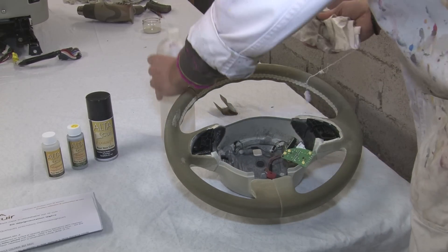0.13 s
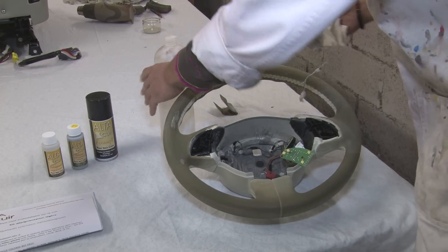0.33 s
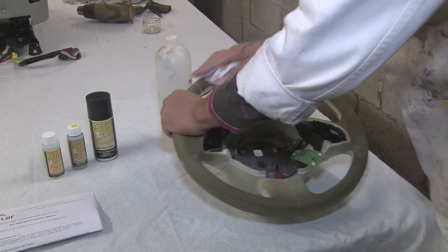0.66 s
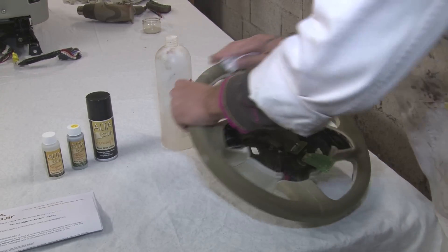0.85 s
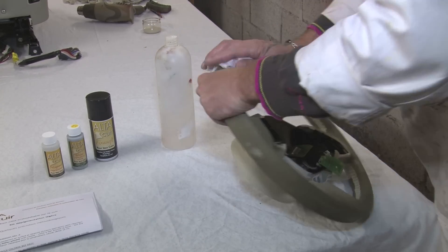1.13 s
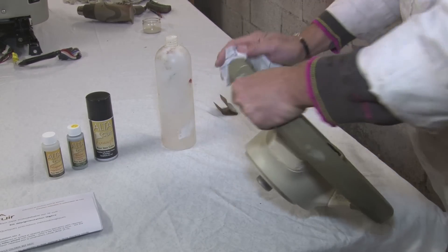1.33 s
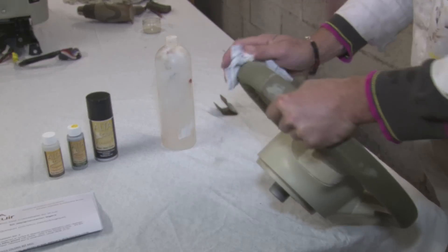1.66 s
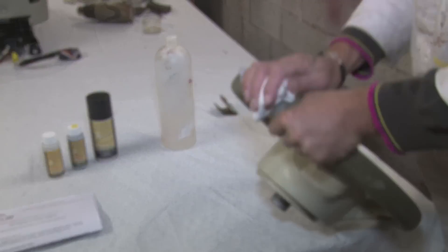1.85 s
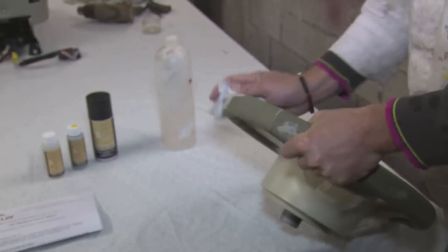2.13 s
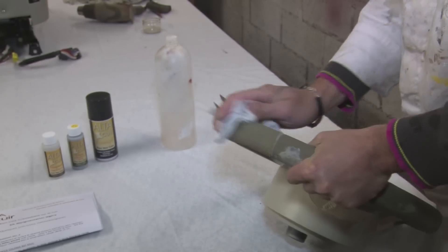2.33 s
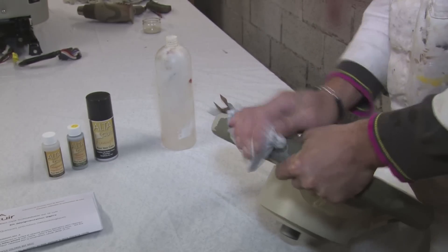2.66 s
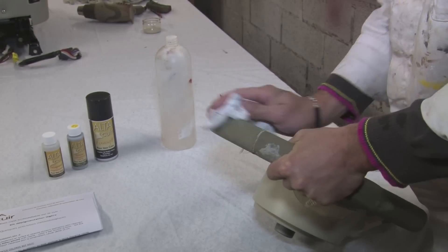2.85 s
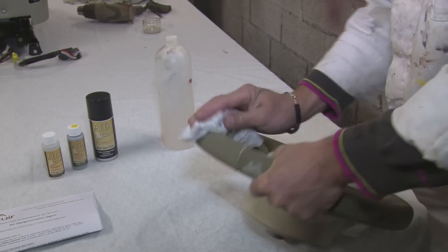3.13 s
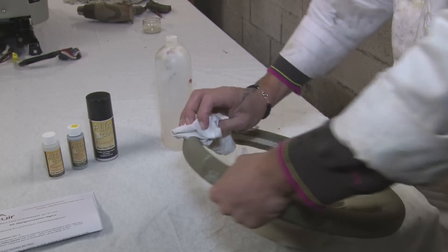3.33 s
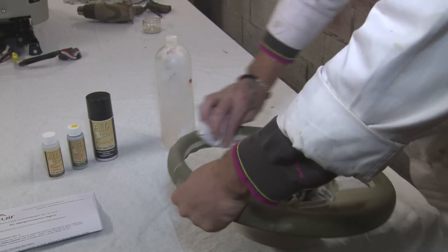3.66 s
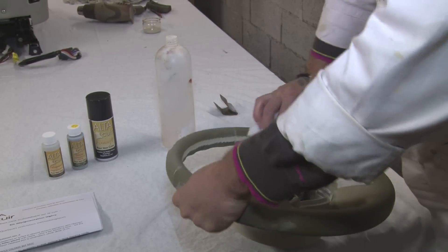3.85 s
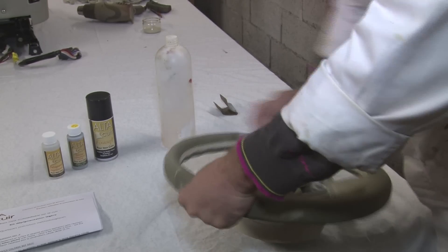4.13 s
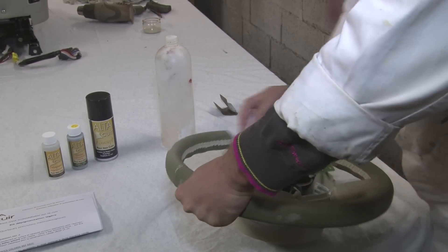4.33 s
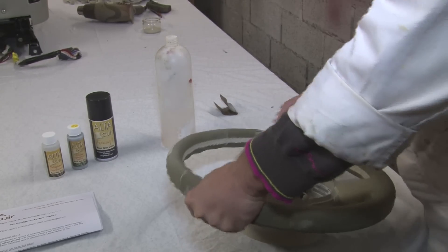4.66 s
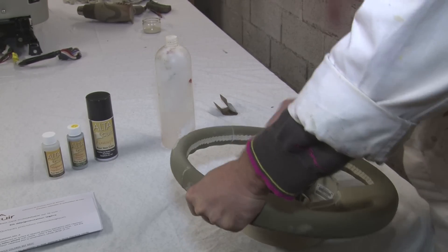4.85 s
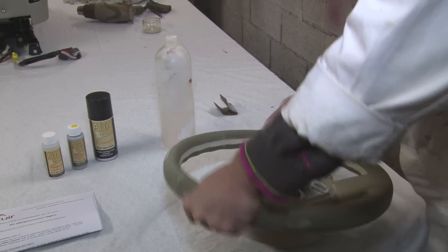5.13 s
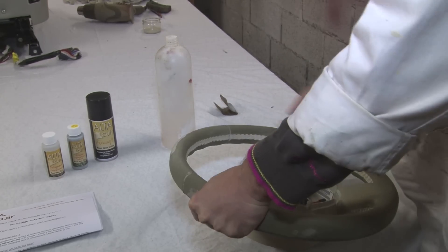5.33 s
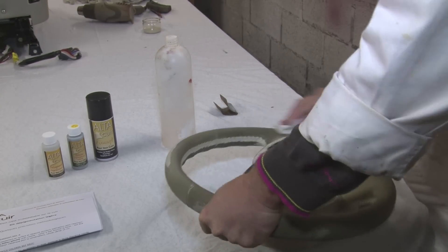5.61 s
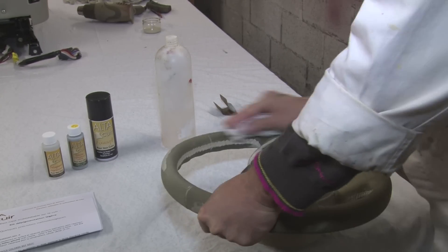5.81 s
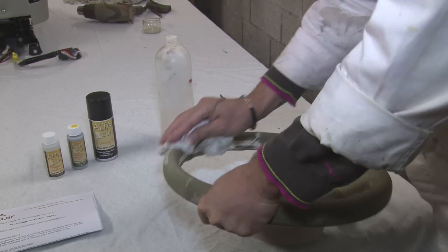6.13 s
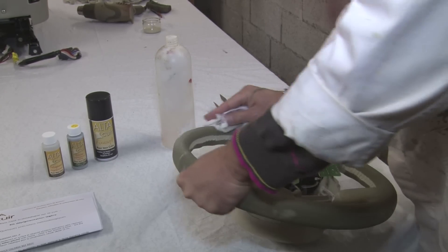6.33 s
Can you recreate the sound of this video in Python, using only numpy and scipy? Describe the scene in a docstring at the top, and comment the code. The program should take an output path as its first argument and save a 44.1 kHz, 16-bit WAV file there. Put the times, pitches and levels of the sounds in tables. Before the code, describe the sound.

A close stereo pickup in a bare workshop, with faint steady air noise and short echoes. At about 0.26 s a plastic bottle lands hard on a covered bench: a loud, boomy knock with a quick clattering second contact, by far the loudest event, dropping abruptly at about 0.33 s. Faint rustling leads to a rag rubbing a leather steering wheel rim from 0.65 s, in dry, grainy swishes about a fifth of a second long. Soft bumps and scuffs as the wheel shifts come at 1.05-1.3 s, over low rumble. The wiping is brighter and stronger from 1.9 to 3.1 s, with a tiny squeak at 2.26 s, then thins briefly before a fuller stroke at 3.6 s. A low tap falls at 3.75 s. From 4.3 to 5.3 s knuckle raps and snaps cluster among rougher scuffs, clearest at 4.35 and 4.5 s. A long, strong wipe at 5.75-6.1 s precedes weaker final strokes.

```python
"""A plastic bottle is set down hard on a covered workbench in a bare workshop: clicks and chatter ring its modes.
Sleeve or rag rustles; then a rag is wiped back and forth over a leather steering wheel rim: swelling grain noise.
As it goes on the wheel scuffs and bumps on the bench, which rumbles, and two fibres whistle briefly.
Later, knuckles and rag snap on the rim more often; echoes and faint air noise lie under everything."""
import sys
import numpy as np
from scipy import signal
from scipy.fft import rfft, irfft
from scipy.io import wavfile

SR = 44100
rng = np.random.default_rng(int(sys.argv[2]) if len(sys.argv) > 2 else 0)


def persist_wave(psi):
    """Save psi, clipped to +-1, as 16-bit WAV."""
    counts = np.round(np.clip(psi, -1, 1) * 32767).astype(np.int16)
    wavfile.write(sys.argv[1], SR, np.atleast_2d(counts).T)


N = 285768

# Spectra of the fibre hiss and of the leather body: (frequency [Hz], relative density [dB per Hz])
FIBRE_SPECTRUM = [(1940, -31), (3300, -6.5), (3540, -13), (4390, -7), (4900, -7.5), (6280, -3.5),
                  (8410, -9), (9330, -14.5), (10700, -10.5), (15600, -20.5)]
LEATHER_SPECTRUM = [(530, -123), (900, -8), (1130, -5.5), (1280, -5), (1440, -3), (2520, 4.5), (3530, -2),
                    (3700, -2.5), (4810, -10.5), (8140, -120)]
LINT_HZ = 8220   # the finest fibre ends sound above this


def rag():
    """Friction noise: fibres skipping over the grain hiss, finest ends highest; the padded leather answers lower."""
    fibres = coloured(FIBRE_SPECTRUM, spread_db=2.0, patchy_db=0.88, side_db=-15.0)
    lint = rms_one(butter_filter(5, LINT_HZ, "high", fibres))
    weave = rms_one(butter_filter(5, LINT_HZ, "low", fibres))
    leather = coloured(LEATHER_SPECTRUM, spread_db=1.5, patchy_db=2.0, side_db=6)
    out = np.sqrt(stroke_power("hiss")) * weave
    out += np.sqrt(stroke_power("lint")) * lint
    return out + np.sqrt(stroke_power("body")) * leather


# Strokes of the rag (the first two rows: rustle of sleeve or rag before the wiping):
# (start [s], length [s], share of the length before top speed [1],
# pointedness, small = long hold at the top [1], fibre hiss level [dB], finest fibres against the hiss [dB],
# leather body against the hiss [dB], share of the length before the leather is loudest [1])
RAG_STROKES = [(0.255, 0.17, 0.15, 0.51, -64, -13, 0, 0.3), (0.417, 0.22, 0.2, 2.0, -73.5, -8, -6, 0.36),
               (0.591, 0.14, 0.13, 2.3, -58.7, -5.5, -13, 0.12),
               (0.647, 0.246, 0.44, 2.9, -52.5, -7, -4.5, 0.49),
               (0.821, 0.2, 0.59, 1.37, -53, -7, -4, 0.52),
               (0.949, 0.33, 0.72, 0.81, -55, -7.9, -0.5, 0.67),
               (1.241, 0.199, 0.54, 1.9, -53, -5.5, -2.5, 0.55),
               (1.399, 0.22, 0.53, 1.56, -50, -8.5, -4.5, 0.48),
               (1.607, 0.21, 0.44, 1.35, -50.5, -7.5, -3, 0.36),
               (1.806, 0.17, 0.54, 0.98, -49.5, -8.5, -4.5, 0.62),
               (1.95, 0.25, 0.68, 0.68, -46.5, -7.5, -6.5, 0.56),
               (2.196, 0.195, 0.39, 0.88, -46.5, -9, -7.5, 0.37),
               (2.319, 0.28, 0.69, 1.08, -48, -9, -6, 0.68),
               (2.608, 0.25, 0.33, 2.24, -46, -8.5, -7.5, 0.4),
               (2.795, 0.28, 0.26, 2.5, -53.5, -9, -2.5, 0.22),
               (2.83, 0.28, 0.69, 0.99, -46, -10, -5, 0.62),
               (3.097, 0.21, 0.39, 2.5, -46.5, -9.5, -3.5, 0.44),
               (3.238, 0.23, 0.67, 0.84, -62.5, -7.5, 2.8, 0.75),
               (3.467, 0.29, 0.12, 2.9, -62, -7, 1.7, 0.06),
               (3.554, 0.38, 0.67, 1.67, -45.5, -9, -5.5, 0.66),
               (3.911, 0.13, 0.6, 0.4, -65.3, -5, 5, 0.17),
               (3.976, 0.12, 0.55, 2.3, -46.5, -9.5, -6.5, 0.49),
               (4.115, 0.2, 0.5, 0.9, -48.5, -9.7, -1, 0.55),
               (4.246, 0.24, 0.74, 0.97, -56, -7.5, 1.2, 0.27),
               (4.438, 0.3, 0.56, 2.8, -51.5, -7, 0.4, 0.63), (4.716, 0.191, 0.46, 1, -52, -10.3, 1, 0.48),
               (4.899, 0.32, 0.19, 2.8, -56.5, -10.5, 3.4, 0.19),
               (5.086, 0.15, 0.34, 2.5, -57.5, -11, 1.5, 0.35), (5.187, 0.25, 0.45, 2.6, -53, -11, 0, 0.39),
               (5.545, 0.084, 0.11, 2.9, -65.0, -4, -11, 0.12),
               (5.595, 0.17, 0.45, 0.94, -51.5, -5.5, -2, 0.35),
               (5.729, 0.39, 0.73, 1.05, -45, -8, -4.5, 0.73),
               (6.177, 0.23, 0.39, 1.34, -56, -8.5, -2, 0.3), (6.29, 0.16, 0.77, 0.8, -63, -8, -8, 0.8)]
# the leather swells broader than the hiss, its top earlier or later from stroke to stroke;
# the finest fibres swell slightly narrower
BODY_SHARPNESS, LINT_SHARPNESS, BODY_START_SHIFT_S = 0.63, 1.04, 0.0088


def stroke_power(layer):
    """Power addition: all strokes together in the hiss, the finest fibres ("lint") or the leather ("body")."""
    start, length, share, pointed, hiss_db, lint_db, body_db, body_share = np.transpose(RAG_STROKES)
    if layer == "body":
        body_rows = np.c_[start + BODY_START_SHIFT_S, length, body_share]
        return from_db(2 * (hiss_db + body_db)) @ swells(body_rows, BODY_SHARPNESS * pointed)
    if layer == "lint":
        return from_db(2 * (hiss_db + lint_db)) @ swells(RAG_STROKES, LINT_SHARPNESS * pointed)
    return from_db(2 * hiss_db) @ swells(RAG_STROKES, pointed)


# Slides of the wheel on the bench:
# (start [s], length [s], share of the length before the top [1], level [dB], centre [Hz])
WHEEL_SLIDES = [(.68, 0.18, 0.32, -60, 1240), (1.05, 0.084, 0.17, -52, 520), (1.08, 0.19, 0.23, -51.5, 910),
                (1.265, 0.24, 0.21, -59.5, 790), (2.33, 0.11, 0.6, -66, 630), (2.73, 0.23, 0.34, -56, 960),
                (3.29, 0.47, 0.31, -62, 1250), (4.22, .13, 0.52, -50.5, 820), (4.31, 0.18, 0.16, -47, 820),
                (4.495, 0.16, 0.096, -49, 880), (4.76, .16, 0.68, -51.5, 1460),
                (4.89, 0.31, 0.17, -51.5, 1450), (5.12, 0.091, 0.45, -51.5, 670),
                (5.21, 0.2, 0.45, -50.5, 1150), (6.0, 0.19, 0.44, -59.5, 1170)]
SCUFF_SHARPNESS = 1.97
DRAG_DB, DRAG_HZ = -12.5, 1370   # every stroke also drags the wheel a little; level against the leather body


def scuff():
    """Friction-driven resonance: coarse slips ring the low rim modes, most those near the moving centre."""
    drag_power = from_db(2 * DRAG_DB) * stroke_power("body")
    level, centre_hz = level_and_centre(WHEEL_SLIDES, SCUFF_SHARPNESS, drag_power, DRAG_HZ)
    out, power = np.zeros((2, N)), np.zeros(N)
    for hz, _, t60 in [mode for mode in RIM_MODES if mode[0] < 1800]:
        near = np.exp(-(np.log2(hz / centre_hz) / 0.88) ** 2)
        near = near * from_db(2.2 * drift(3.3))
        slips = grains(3.8) + 0.39 * grains(1.8) * np.array([[1], [-1]])   # common part and side part
        out += near * rms_one(ring(slips, hz, 0.5 * t60))   # half the free decay time
        power += near ** 2
    out = butter_filter(4, 330, "high", out)   # the ring is too thin to radiate bass
    return level * out / np.sqrt(power)


# Knuckles and rag snapping on the rim:
# (time [s], level [dB], favoured frequency [Hz], spread [octaves], chatter decay time [s per 60 dB])
RIM_TAPS = [(.721, -47, 2400, 1.3, 0.02), (3.752, -42, 430, 0.26, .08), (4.334, -38.5, 1100, 1.1, 0.04),
            (4.344, -41, 2520, 0.94, 0.041), (4.352, -38.5, 746, 0.33, 0.38),
            (4.503, -42.5, 950, 0.87, 0.064), (4.508, -38, 1890, 0.65, 0.1),
            (4.717, -55, 1500, 1.5, 0.0061), (4.82, -46, 1330, 0.4, 0.12), (4.93, -45, 1280, 0.87, 0.069),
            (5.152, -44, 800, 1.2, 0.09), (5.2846, -51, 5500, 1.7, 0.0049), (5.2889, -44, 4000, 2.8, 0.007),
            (5.608, -55, 3980, 1.3, 0.0078)]
# Modes of the wheel rim: (frequency [Hz], level [dB], free decay time [s per 60 dB])
RIM_MODES = [(446, -17, 0.11), (452, -9, 0.17), (630, -15, 0.04), (732, -8.5, 0.091), (882, -20, 0.031),
             (1025, -7.5, 0.036), (1140, -10, 0.032), (1326, 3, 0.019), (1492, -16, 0.043),
             (1602, -10.5, 0.051), (1920, -2, 0.03), (2280, -14, 0.023), (2830, 3.5, 0.0066),
             (4470, -15, .006), (5820, 10.5, 0.0087), (8400, -6, .004), (10500, 1, 0.0092)]


def rim_taps():
    """Modal excitation by impact: knuckles and rag set the rim modes ringing."""
    return struck(RIM_TAPS, RIM_MODES, spread_db=5.0, chatter_db=19.5, split=0.062, click_db=-28, rise_share=0.16)


# A fibre catches and whistles: (time [s], peak level [dB], frequency [Hz], decay time [s per 60 dB])
FIBRE_WHISTLES = [(2.257, -35.5, 5700, .02), (5.035, -48, 5680, 0.017)]


def squeaks():
    """Narrow-band resonance: a few milliseconds of slipping drive one resonator."""
    out = np.zeros(N)
    for start, db, hz, t60 in FIBRE_WHISTLES:
        force = rng.standard_normal(SR // 20) * (np.arange(SR // 20) < .008 * SR)
        tone = ring(force, hz, t60)
        out[round(start * SR):][:len(tone)] += from_db(db) * tone / np.abs(tone).max()
    return out


# Blows on the bench, before the gain over time:
# (time [s], level [dB], favoured frequency [Hz], spread [octaves], chatter decay time [s per 60 dB])
BENCH_BLOWS = [(.2622, -34.5, 900, 3.7, 0.24), (.279, -39, 288, 1.75, 0.38), (1.056, -53, 318, 1.5, 0.037),
               (1.088, -44, 182, 0.22, 0.032), (1.325, -59.5, 493, 1.4, 0.022),
               (2.39, -60, 360, 0.87, 0.059)]
# Modes of the bench: (frequency [Hz], level [dB], free decay time [s per 60 dB])
BENCH_MODES = [(64.6, -6, 1), (123.2, 5.5, 0.47), (133.4, -13, 0.5), (168, -0.5, 0.13), (218.2, -6.5, 0.28),
               (304, -2.5, 0.095), (356, -32, 0.17), (457, -5.5, 0.081), (526, -5.5, 0.086),
               (646, -20, 0.1), (795, -14, 0.13), (899, -12, 0.073), (982, -2.5, 0.029), (1103, 0, 0.019),
               (1110, -26, 0.062), (1153, -2, 0.028), (1303, -8.5, 0.073), (1377, -3, 0.042),
               (1540, -23, 0.054), (1530, -12, 0.028), (1810, -21, 0.066), (2160, -24, 0.078),
               (2440, -21, 0.057), (2510, -22, 0.036)]
# Gain of the bench sound over time: the boom drops suddenly at 0.33 s, and later bumps come back louder:
# (time [s], gain [dB])
BENCH_GAIN = [(0, 12), (.328, 8.5), (.345, -4.5), (.9, -12), (1.0, 4.5)]
CONTACT_HZ = 2630   # the cover softens each blow


def bench_blows():
    """Modal excitation by impact: the blows ring the bench modes; the soft cover low-passes the sound."""
    bench = struck(BENCH_BLOWS, BENCH_MODES, spread_db=1.5, chatter_db=15.5, split=0.062, click_db=-1, rise_share=.01)
    gain_s, gain_db = np.transpose(BENCH_GAIN)
    bench *= from_db(np.interp(np.arange(N) / SR, gain_s, gain_db))
    return butter_filter(2, CONTACT_HZ, "low", bench)


# Weight shifts on the bench top:
# (start [s], length [s], share of the length before the top [1], level [dB], centre [Hz])
WEIGHT_SHIFTS = [(.8, 0.15, 0.44, -69, 135), (1.04, 0.84, .12, -62.5, 151), (1.95, .16, .45, -71.5, 145),
                 (2.13, 0.21, 0.41, -73.5, 148), (2.3, 0.12, 0.56, -74, 186), (2.48, 0.19, .55, -69, 152),
                 (2.76, 0.18, 0.43, -70, 140), (2.9, 0.33, 0.088, -66, 138), (3.38, .1, 0.51, -72, 149),
                 (3.46, 0.17, 0.3, -60.5, 132), (3.72, .22, 0.61, -73.5, 149), (4.0, 0.41, 0.51, -76, 160),
                 (4.88, 0.26, 0.41, -71, 152), (5.13, .12, 0.57, -70.5, 151), (5.25, 0.21, .2, -66, 190),
                 (5.82, .21, 0.42, -75, 154), (6.05, 0.15, 0.49, -72, 130), (6.18, 0.13, 0.6, -73.5, 156)]
LOAD_SHARPNESS = 1.25
REST_DB, REST_HZ = -82.5, 177   # between shifts the bench barely stirs


def rumble():
    """Forced vibration: shifting weight stirs the lowest bench modes, most those near where it presses."""
    level, centre_hz = level_and_centre(WEIGHT_SHIFTS, LOAD_SHARPNESS, from_db(2 * REST_DB), REST_HZ)
    out, power = np.zeros(N), np.zeros(N)
    for hz, _, t60 in [mode for mode in BENCH_MODES if mode[0] < 280]:
        near = np.exp(-(np.log2(hz / centre_hz) / 0.5) ** 2)
        out += near * rms_one(ring(grains(4.65), hz, 0.77 * t60))
        power += near ** 2
    return level * out / np.sqrt(power)


# Reverberation of the workshop: (frequency [Hz], decay time [s per 60 dB])
WORKSHOP_DECAY = [(100, 0.61), (500, 0.33), (1300, 0.4), (3000, 0.46), (9000, 0.16)]
SHOP_DB, SHOP_SIDE_DB = -4, -5


def workshop(x):
    """Diffuse reverberation: noise builds up, then dies octave by octave; both ports hear mostly the same walls."""
    t = np.arange(SR) / SR
    white, echoes = rng.standard_normal((2, SR)), 0
    for low in 45 * 2. ** np.arange(8):
        band = butter_filter(2, [low, 2 * low], "band", white)
        echoes = echoes + band * from_db(-60 * t / at_hz(WORKSHOP_DECAY, low * np.sqrt(2)))
    mid, side = echoes * np.minimum(t / 0.0034, 1) / np.sqrt(0.016 * SR)
    side = from_db(SHOP_SIDE_DB) * butter_filter(1, 350, "high", side)   # long waves reach both ports alike
    return signal.fftconvolve(x[None], np.array([mid + side, mid - side]), axes=1)[:, :N]


# Spectrum of the air noise: (frequency [Hz], relative density [dB per Hz])
AIR_SPECTRUM = [(18, -76), (30, -18), (133, -15.5), (169, -21), (203, -9.5), (292, -7), (370, -8.5),
                (592, -7), (877, -10), (1330, -2), (1690, -8.5), (5620, -17), (15600, -34.5)]
AIR_DB = -64


def air():
    """Stationary broadband noise: a wide, faint bed whose bands flicker."""
    return from_db(AIR_DB) * coloured(AIR_SPECTRUM, spread_db=2.5, patchy_db=0.94, side_db=6.0)


def struck(blows, modes, spread_db, chatter_db, split, click_db, rise_share):
    """Impact on a modal body: a click and a dying chatter of small contacts ring a favoured range of modes."""
    out, t = np.zeros(N), np.arange(SR // 2) / SR
    chatter_t = t[:SR // 5]
    for start, db, centre_hz, octaves, chatter_s in blows:
        rise = np.minimum((t + 1 / SR) / (rise_share * chatter_s + 1 / SR), 1)
        for k, (hz, mode_db, t60) in enumerate(modes):
            noise = rng.standard_normal(len(chatter_t)) / np.sqrt(chatter_s * SR)
            force = np.zeros(len(t))
            force[:len(chatter_t)] = from_db(chatter_db - 60 * chatter_t / chatter_s) * noise
            force *= min(hz / 700, 1)   # small contacts are too light to move the low modes
            force *= rise
            force[0] = (-1) ** k * from_db(click_db)
            # a weaker twin a little higher blurs the ring
            pair = ring(force, hz, t60) + 0.12 * ring(force, hz * (1 + split), t60)
            favoured = np.exp(-(np.log2(hz / centre_hz) / octaves) ** 2)
            gain = from_db(db + mode_db + spread_db * rng.standard_normal())
            out[round(start * SR):][:len(t)] += favoured * gain * pair
    return out


def swells(rows, sharpness):
    """Half-sine motion: speed rises and falls, leaning early or late; one power curve a row, top 1."""
    out = np.zeros((len(rows), N))
    for power, (start, length, share, *_), sharp in zip(out, rows, sharpness * np.ones(len(rows))):
        u = np.arange(round(length * SR)) / (length * SR)
        warp = np.log(.5) / np.log(np.clip(share, .05, .95))   # puts the top at the given share
        speed = np.abs(np.sin(np.pi * u ** warp))
        span = power[round(start * SR):][:len(u)]
        span += speed[:len(span)] ** (2 * max(sharp, .2))
    return out


def level_and_centre(rows, sharpness, steady_power, steady_hz):
    """Incoherent addition: motions add in power, and the centre is their power-weighted mean."""
    table = np.array(rows)
    power = from_db(2 * table[:, 3:4]) * swells(rows, sharpness)
    steady_power = steady_power + 1e-18
    total = power.sum(axis=0) + steady_power
    return np.sqrt(total), (table[:, 4] @ power + steady_hz * steady_power) / total


# Stereo width before each source's own offset: (frequency [Hz], side against mid [dB])
STEREO_WIDTH = [(60, -2), (150, -18), (500, -12.5), (1000, -15), (2500, -19.5), (3600, -14), (5000, -8.5)]


def coloured(spectrum, spread_db, patchy_db, side_db):
    """Spectral shaping: stereo grains, rms 1, whose neighbouring bands flicker partly together."""
    hz = np.arange(N // 2 + 1) * SR / N
    mid, side = rfft([grains(spread_db), grains(spread_db)]) * from_db(at_hz(spectrum, hz))
    side = side * from_db(at_hz(STEREO_WIDTH, hz) + side_db)
    pair = np.array([mid + side, mid - side])
    place = 1.57 * np.log2(hz + 1)
    out, together = 0, drift(20)
    for k in range(3):   # three interleaved combs of bands
        comb = np.cos(np.pi * (place - k) / 3) ** 2
        flicker_db = patchy_db * (0.8 * together + drift(30))
        out = out + irfft(pair * comb, N) * from_db(flicker_db)
    return rms_one(out)


def grains(spread_db):
    """Stick-slip as a random series: one tiny slip per sample, random in sign, long-tailed in size."""
    size = from_db(spread_db * np.minimum(rng.exponential(1, N), 6))
    return size * rng.choice([-1, 1], N)


def ring(x, hz, t60):
    """Damped resonator: a unit click sets a decaying sine of starting height 1 ringing."""
    r, w = from_db(-60 / (t60 * SR)), 2 * np.pi * hz / SR
    return signal.lfilter([0, np.sin(w)], [1, -2 * r * np.cos(w), r * r], x + 1e-18)


def drift(rate):
    """Low-passed chance: noise at every 40th sample through a double one-pole filter, rms 1."""
    r = np.exp(-80 * np.pi * rate / SR)
    slow = signal.lfilter([1], [1, -2 * r, r * r], rng.standard_normal(N // 40 + 2002))[2000:]
    return np.interp(np.arange(N) / 40, np.arange(len(slow)), rms_one(slow))


def butter_filter(order, hz, kind, x):
    """Maximally flat (Butterworth) filtering."""
    return signal.sosfilt(signal.butter(order, hz, kind, fs=SR, output="sos"), x)


def from_db(db):
    """Decibel law: level to amplitude factor."""
    return 10 ** (np.asarray(db) / 20)


def rms_one(x):
    """Normalisation to unit effective value."""
    return x / np.sqrt(np.mean(x ** 2) + 1e-20)


def at_hz(points, hz):
    """Interpolation along a logarithmic frequency axis."""
    points_hz, values = np.transpose(points)
    return np.interp(np.log(np.maximum(hz, 1)), np.log(points_hz), values)


BENCH_LEFT_DB, BENCH_BASS_HZ = -1.7, 200   # the boom of the bench leans right
WALL_LOW_HZ = 220   # the walls return little of the boom


def scene():
    """Superposition: direct sounds, their echoes and the air add linearly."""
    rubbing = rag() + scuff()
    taps = butter_filter(2, 350, "high", rim_taps() + squeaks())
    bench = bench_blows()
    top = bench + rumble()
    boom = butter_filter(1, BENCH_BASS_HZ, "low", top)
    hits = top - boom + boom * from_db([[BENCH_LEFT_DB], [-BENCH_LEFT_DB]]) + taps
    to_walls = bench + taps + from_db(-1.5) * rubbing[0]
    walls = workshop(butter_filter(2, WALL_LOW_HZ, "high", to_walls))
    return hits + rubbing + from_db(SHOP_DB) * walls + air()


LOW_CUT_HZ, DIP_HZ, DIP_WIDTH_HZ, DIP_SHARE = 93, 3560, 400, 0.6
OVERLOAD = .13   # amplitude at which peaks saturate
MONO_ABOVE_HZ, CUTOFF_HZ = 5250, 15780


def record(dry):
    """Sound as heard: thin bass, a dip near 3.6 kHz, rounded peaks, mono above 5.25 kHz, nothing above 15.8 kHz."""
    x = butter_filter(2, LOW_CUT_HZ, "high", dry)
    mid, side = (x[0] + x[1]) / 2, (x[0] - x[1]) / 2
    dip = signal.iirpeak(DIP_HZ, DIP_HZ / DIP_WIDTH_HZ, SR)
    mid = mid - DIP_SHARE * signal.lfilter(*dip, mid)
    mid, side = OVERLOAD * np.tanh(np.array([mid, side]) / OVERLOAD)
    side = signal.sosfiltfilt(signal.ellip(8, .3, 45, MONO_ABOVE_HZ, fs=SR, output="sos"), side)
    top_cut = signal.ellip(16, .3, 70, CUTOFF_HZ, fs=SR, output="sos")
    return signal.sosfilt(top_cut, [mid + side, mid - side])


dry = scene()
out = record(dry)
persist_wave(out)
```